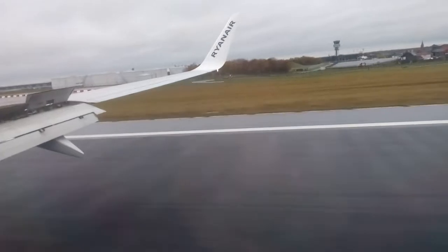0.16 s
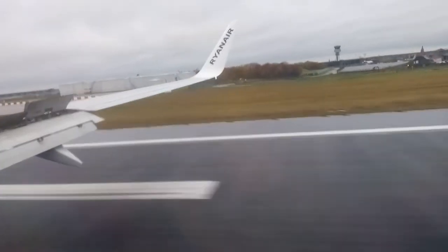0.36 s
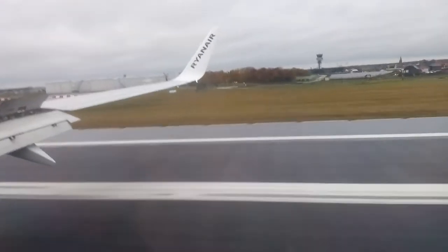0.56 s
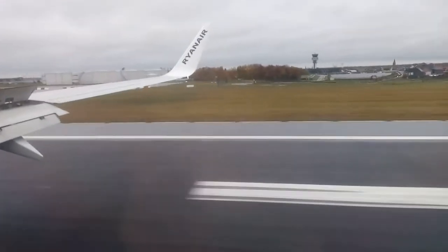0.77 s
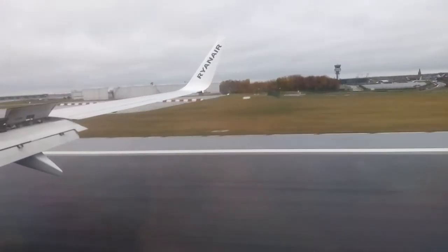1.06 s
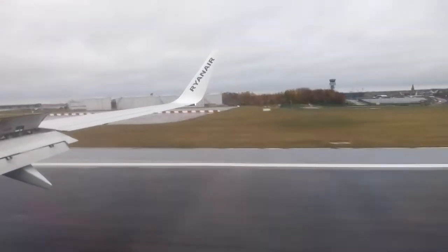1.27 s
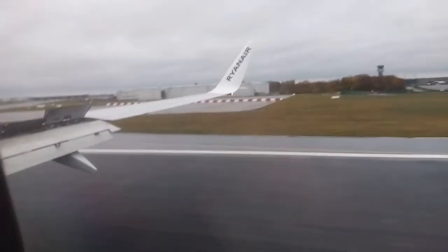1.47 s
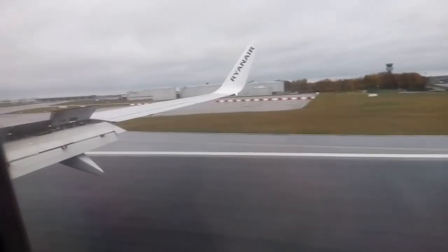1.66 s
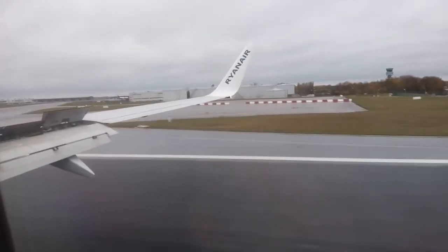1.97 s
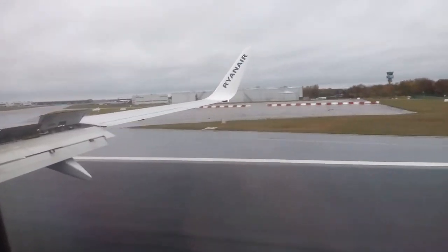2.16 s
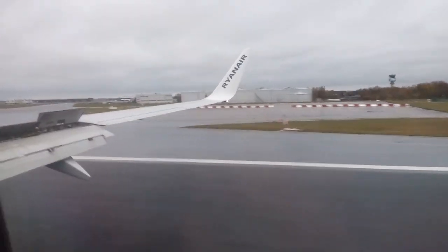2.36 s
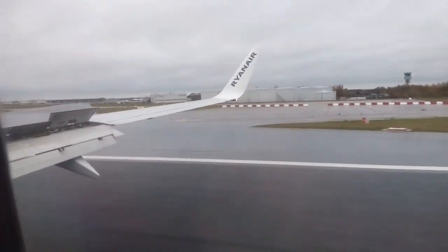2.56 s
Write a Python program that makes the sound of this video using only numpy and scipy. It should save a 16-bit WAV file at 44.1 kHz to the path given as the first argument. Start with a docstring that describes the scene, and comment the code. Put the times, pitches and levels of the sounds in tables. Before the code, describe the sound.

Inside a jet rolling on a runway, a steady low boom and muffled roar fill the small, dry cabin; loose panels rattle and jingle in the first half second, light plastic ticks follow, and a late clatter returns.

```python
"""Airliner cabin on the runway

An airliner rolls along a wet runway, heard at a cabin window: wheels and fuselage boom as low shaped noise,
jet and air roar as wall-dulled noise with panel resonances. Shaken trim rattles as dense shaped grains;
plastic ticks and panel knocks are struck damped modes, and a small metal part jingles as decaying sines."""
import sys
import numpy as np
from scipy import signal
from scipy.fft import rfft, irfft
from scipy.io import wavfile

SR = 44100
rng = np.random.default_rng(int(sys.argv[2]) if len(sys.argv) > 2 else 0)


def amp(db):
    return 10 ** (np.asarray(db, float) / 20)


def file_out(sig):
    """Save sig as 16-bit WAV at sys.argv[1]."""
    # one column per channel
    cols = np.atleast_2d(sig).T
    # limit, then scale
    lim = np.clip(cols, -1, 1)
    pcm = np.round(lim * 32767).astype(np.int16)
    wavfile.write(sys.argv[1], SR, pcm)


N = 119070

SIDES = np.array([[1], [-1]])  # left, right
# correlation of left and right in the cabin: f/Hz, likeness (-1 to 1)
LIKENESS = [(40, .99), (200, .99), (300, .96), (400, 0.97), (670, 0.26), (1220, -0.28), (2230, 0.05),
            (4060, -0.09), (7420, 0)]


def rms_one(x):
    """Normalisation of the mean power to 1."""
    return x / np.sqrt(np.mean(x ** 2) + 1e-20)


def in_time(rows):
    """Amplitude envelope: levels joined linearly in dB, as gain per sample."""
    t, db = np.transpose(rows)
    return amp(np.interp(np.arange(N) / SR, t, db))


def at_hz(points, hz):
    """Interpolation of a spectrum along a logarithmic frequency axis."""
    f, value = np.transpose(points)
    return np.interp(np.log(hz), np.log(f), value)


def drift(rate_hz):
    """Random modulation of spread 1: noise through two equal real poles at rate_hz."""
    step = 40  # samples between the computed points
    pole = np.exp(-2 * np.pi * rate_hz * step / SR)
    noise = rng.standard_normal(N // step + 2002)
    slow = signal.lfilter([1], [1, -2 * pole, pole ** 2], noise)[2000:]  # past the settling
    return np.interp(np.arange(N) / step, np.arange(len(slow)), rms_one(slow - slow.mean()))


def pair(mid, side, alike):
    """Interaural correlation: shares of two unrelated signals, the second opposed left to right."""
    alike = np.clip(alike, -.99, .99)
    return np.sqrt((1 + alike) / 2) * mid + np.sqrt((1 - alike) / 2) * side * SIDES


def coloured(x, spectrum):
    """Spectral shaping: two unrelated signals take a spectrum, the cabin's likeness and its lean."""
    # level difference of the sides: f/Hz, L-R/dB
    side_lean = [(60, 1), (180, 1.5), (300, 0), (510, -3.5), (870, 3.5), (1490, 3.5), (2540, 4.5),
                 (4340, 2.5), (7420, 9.5)]
    hz = np.maximum(np.fft.rfftfreq(N, 1 / SR), 1)
    mid, side = rfft(x) * amp(at_hz(spectrum, hz))
    lean = amp(at_hz(side_lean, hz) / 2 * SIDES)
    return rms_one(irfft(pair(mid, side, at_hz(LIKENESS, hz)) * lean, N))


def coloured_noise(spectrum):
    """Broadband random excitation given a spectrum, stereo, rms 1."""
    return coloured(rng.standard_normal((2, N)), spectrum)


def resonant_noise(hz, width_hz, alike):
    """Resonance under random drive: noise passes twice through one two-pole resonator."""
    r = np.exp(-np.pi * width_hz / SR)
    sos = [[1, 0, -1, 1, -2 * r * np.cos(2 * np.pi * hz / SR), r * r]] * 2
    settle = SR // 2
    mid, side = signal.sosfilt(sos, rng.standard_normal((2, N + settle)))[:, settle:]
    return rms_one(pair(mid, side, alike))


def wheels():
    """Structure-borne rolling noise: a deep rumble that fades with speed and wavers by about 1 dB."""
    # rumble envelope: t/s, level/dB
    level = [(0, -17.5), (.9, -20), (1.8, -20), (2.7, -27.5)]
    # rumble spectrum: f/Hz, relative density/dB per Hz
    tone = [(12, -52.5), (20, -15), (38, -3), (86, 7), (160, -6.5), (210, -29.5), (350, -120)]
    return in_time(level) * amp(drift(11)) * coloured_noise(tone)


def fuselage_boom():
    """Modal response of an enclosure: low noise plus cabin resonances under one envelope."""
    # boom envelope: t/s, level/dB (the noise lies 1 dB lower)
    envelope = [(0, -13.5), (.9, -12), (1.9, -12), (2.2, -14), (2.7, -14.5)]
    # boom spectrum: f/Hz, relative density/dB per Hz
    tone = [(65, -42.5), (110, -6.5), (178, -4), (230, -0.5), (265, -9), (346, -7.5), (372, -16),
            (440, -14.5), (473, -19), (1000, -38.5), (1300, -63), (2200, -120)]
    # cabin resonances: f/Hz, width of one resonator pass/Hz, level at mean envelope/dB
    resonances = [(177, 83, -20.5), (227, 82.6, -17.5), (289, 45, -29), (345.1, 22.3, -28.5),
                  (433.4, 29, -45.5)]
    level = in_time(envelope)
    boom = amp(-1) * level * coloured_noise(tone)
    modes = 0
    for hz, width_hz, db in resonances:
        waver = amp(db + 0.9 * drift(1.6))
        modes = modes + waver * resonant_noise(hz, width_hz, at_hz(LIKENESS, hz))
    return boom + modes * level / level.mean()


def roar():
    """Transmission loss: jet and air roar dulled by the wall, fluttering by about 1 dB."""
    # roar envelope: t/s, level/dB
    level = [(0.0, -33), (0.35, -35.5), (0.47, -37.5), (0.67, -35.5), (1.35, -34.5), (2.53, -35),
             (2.7, -34.5)]
    # roar spectrum inside the wall: f/Hz, relative density/dB per Hz
    tone = [(410, -18.5), (700, 0), (780, -2.5), (1010, -6), (1410, -6.5), (1780, -13.5), (2180, -10.5),
            (2530, -16), (3470, -20.5), (5360, -26), (6630, -31), (7870, -48), (9000, -59), (12000, -58),
            (15500, -64.5), (17300, -120)]
    return in_time(level) * amp(1.1 * drift(35)) * coloured_noise(tone)


def wall_panels():
    """Plate resonance: panels sing in narrow bands that come and go."""
    # panel resonances: f/Hz, width of one resonator pass/Hz, base level/dB, left-right likeness
    panels = [(1410, 90, -48, -.5), (2230, 130, -52, .3), (800, 80, -50, .3)]
    # swell over the base level: t/s, then gain/dB of each panel in the order above
    panel_swell = [(0, -10, -13.5, -1), (1.1, -6, -3.5, 0), (1.45, 0.5, -1, 2), (1.65, -2.5, -3.5, 8.5),
                   (1.78, -0.5, -4, 3), (2.0, 11.5, 0, 3), (2.15, -2.5, -9, 5.5), (2.28, -4, 8, 3),
                   (2.45, 5, -9.5, -10), (2.55, 6, 11.5, 2), (2.7, -2.5, -3.5, -14)]
    swell = np.array(panel_swell)
    waver_db, waver_hz = 3.5, 7
    out = 0
    for k, (hz, width_hz, db, alike) in enumerate(panels):
        level = in_time(swell[:, [0, k + 1]]) * amp(db + waver_db * drift(waver_hz))
        out = out + level * resonant_noise(hz, width_hz, alike)
    return out


def rattles():
    """Repeated micro-impacts: dense grains under rising and dying envelopes, patchy in each band."""
    # trim rattles: t of peak/s, level before the common gain/dB, rise/s, t60/s, L-R/dB, tilt/dB per octave
    events = [(0.018, -33.5, 0.008, 0.22, -4.5, -0.5), (.08, -42, 0.021, 0.16, 1.5, 2.5),
              (0.123, -26.5, 0.0083, 0.34, -5, -.3), (0.151, -34, 0.01, 0.34, 1, 2),
              (0.202, -33, 0.0087, 0.27, -1, -0.8), (.30, -33.5, 0.04, 0.47, -1, 1.2),
              (0.374, -26.5, 0.005, 0.22, -3, 0.5), (0.438, -24, 0.012, .2, -2.5, 2.3),
              (0.444, -36, 0.004, 0.088, -1.5, -6), (0.494, -25, 0.0036, .07, -3, 4.6),
              (0.513, -29, 0.006, 0.1, -3, -1.5), (0.599, -39.5, 0.012, 0.15, -4, 2.5),
              (0.701, -40, 0.013, 0.17, 2.5, 1.7), (.75, -44, 0.014, 0.48, 3.5, 4.5),
              (1.36, -34.5, 0.0068, 0.11, 7.5, -5.5), (2.314, -35.5, 0.0085, 0.25, 2, -1.5),
              (2.336, -28.5, 0.011, 0.28, -0.5, -3), (2.348, -33.5, .006, 0.17, -3, -4),
              (2.428, -37.5, 0.0046, 0.3, -2, -1.5), (2.482, -40.5, 0.013, 0.15, 1, .8),
              (2.589, -35, 0.0059, 0.092, 0.5, -2.8)]
    # grain spectrum: f/Hz, relative density/dB per Hz
    tone = [(530, -21.5), (900, 6.5), (1100, -4.5), (1650, -5.5), (2070, -5), (2750, -5), (3840, -8),
            (5780, -9.5), (6390, -12.5), (7870, -24.5), (10200, -37.5), (13000, -49), (15500, -45),
            (17300, -120)]
    # edges of the bands that crackle independently: f/Hz
    band_edges = [400, 1200, 2000, 3200, 4800, 7000, 16000]
    grains_per_s, grain_db, grain_cap = 6000, 2.5, 3
    gain_db, patch_db, patch_hz, pivot_hz = -5, 1.6, 60, 3000

    present = rng.random((2, N)) < grains_per_s / SR
    strength = amp(grain_db * np.minimum(rng.exponential(1, (2, N)), grain_cap))
    grains = coloured(present * strength * rng.choice([-1, 1], (2, N)), tone)

    powers = []
    for t, db, rise, t60, pan_db, _ in events:
        age = np.arange(N) / SR - t
        onset = np.clip(1 + age / rise, 0, 1)
        envelope = onset * amp(db + gain_db - 60 * np.maximum(age, 0) / t60)
        powers.append((envelope * amp(pan_db / 2 * SIDES)) ** 2)

    tilts = np.array(events)[:, -1]
    out = 0
    for k, (low, high) in enumerate(zip(band_edges, band_edges[1:])):
        # twice the octaves from the pivot to the band centre, so amp() weights power
        weights = amp(tilts * np.log2(low * high / pivot_hz ** 2))
        power = np.tensordot(weights, powers, 1)
        sos = signal.butter(2, [low, high], "band", fs=SR, output="sos")
        band = signal.sosfilt(sos, grains)
        patches = amp(patch_db * drift(patch_hz))
        out = out + (-1) ** k * np.sqrt(power) * patches * band  # neighbouring bands alternate in sign
    return out


def ring(clicks, hz, t60):
    """Impulse response of a damped oscillator: a unit click starts a decaying sine of height 1."""
    r, w = amp(-60 / (t60 * SR)), 2 * np.pi * hz / SR
    return signal.lfilter([0, np.sin(w)], [1, -2 * r * np.cos(w), r * r], clicks + 1e-18)


def struck(events, modes, spread_db, contact_s):
    """Modal superposition: each blow excites every mode, and a soft contact spares the high ones."""
    t, db, pan_db, cut_hz = np.transpose(events)
    at = (t * SR).astype(int)
    out = np.zeros((2, N))
    for hz, level_db, t60 in modes:
        clicks = np.zeros((2, N))
        chance = rng.standard_normal((3, len(t)))
        reach = 1 / np.sqrt(1 + (hz / cut_hz) ** 8)
        # each side draws its own strength
        clicks[:, at] = reach * amp(db + level_db + pan_db / 2 * SIDES + spread_db * chance[:2])
        clicks[1, at] *= np.sign(chance[2] + .7)  # about a quarter are inverted on the right
        # a brief ring at the same pitch drives the mode, which softens its onset
        push = ring(clicks, hz, contact_s) * 2 * (1 - amp(-60 / (contact_s * SR)))
        out += ring(push, hz, t60)
    return out


def knocks():
    """Flexural modes of a panel: dull knocks."""
    # blows: t/s, strike level/dB, L-R/dB, contact cut-off f/Hz
    blows = [(.1245, -26, -4, 3400), (.496, -14, 7, 5200), (1.361, -23, 7, 2600), (1.367, -30, 7, 1500),
             (1.88, -30, 7, 2400), (2.343, -25, 5, 2400), (2.354, -22, 3, 950)]
    # panel modes: f/Hz, relative level/dB, t60/s
    modes = [(800, -5.5, 0.026), (1140, -6, 0.016), (1480, -1.5, 0.0099), (1750, -3.5, 0.0095),
             (2037, -4.5, 0.022), (2890, -10, 0.0092), (3400, -13.5, 0.01), (4260, -12, 0.013)]
    return struck(blows, modes, spread_db=1.5, contact_s=.002)


def jingles():
    """Free decay of a small metal part: single high sines that swell in briefly."""
    # rings: t/s, level before rise and decay (left side)/dB, f/Hz, t60/s
    rings = [(.13, -58, 11850, .05), (.203, -36, 6000, 0.031), (0.265, -50, 11870, .02),
             (.448, -56, 12000, .03), (.4925, -26, 6090, .04), (.4935, -48, 10500, .03),
             (.511, -38, 6150, .025), (.514, -57, 11400, .04), (1.286, -60.5, 12140, 0.033),
             (2.34, -37, 7080, .05), (2.354, -39, 6920, 0.035), (2.368, -44, 7100, .04),
             (2.384, -50.5, 7060, 0.028)]
    rise_s = 0.0018
    out = np.zeros(N)
    for t, db, hz, t60 in rings:
        age = np.maximum(np.arange(N) / SR - t, 0)
        onset = np.minimum(age / rise_s, 1) ** 2
        out += onset * amp(db - 60 * age / t60) * np.sin(2 * np.pi * hz * age)
    return out * amp(np.array([[1.0], [-1.5]]))  # leans left by 2.5 dB; left itself gains 1 dB


def ticks():
    """Stiff-body modes of hard plastic: sharp ticks."""
    # blows: t/s, strike level/dB, L-R/dB, contact cut-off f/Hz
    blows = [(.911, -40, 5, 7600), (1.081, -37, 10, 7000), (1.1095, -28.5, 11.5, 7700),
             (1.302, -36, 9, 6600), (1.3845, -34, 11, 6230), (1.3935, -32.5, 10, 8500),
             (1.473, -37.5, 10, 8500), (1.72, -40.5, 4, 7000), (1.865, -43, 5, 7950), (2.168, -37, 9, 6960),
             (2.2815, -31, 8, 8000), (2.5685, -29.5, 12, 7500)]
    # plastic modes: f/Hz, relative level/dB, t60/s
    modes = [(4200, -5, 0.0063), (5840, -0.5, 0.0049), (6310, -3, 0.0074), (7140, -6.5, 0.0064),
             (8300, -11.5, 0.0042), (9400, -19.5, 0.012), (10200, -19, 0.0056), (12000, -31, 0.0014),
             (13800, -34, 0.0037)]
    return struck(blows, modes, spread_db=2, contact_s=.003)


def cabin(x):
    """Diffuse reverberation: a short exponentially decaying noise tail, separate on each side."""
    t60_s, wet_db, gap_s = 0.069, -16.5, .003
    t = np.arange(SR // 4) / SR
    tail = rng.standard_normal((2, len(t))) * amp(-60 * t / t60_s) * (t > gap_s)
    tail /= np.linalg.norm(tail, axis=1, keepdims=True)
    return x + amp(wet_db) * signal.fftconvolve(x, tail, axes=1)[:, :N]


def scene():
    """Linear superposition of all sources at the window seat; only the hits get the added tail."""
    hits = knocks() + jingles() + ticks()
    return wheels() + fuselage_boom() + roar() + wall_panels() + rattles() + cabin(hits)


def low_pass(x):
    """Removes everything above the highest recorded frequency."""
    return signal.sosfilt(signal.butter(12, 15450, fs=SR, output="sos"), x)


def record(dry):
    """Soft saturation: a hyperbolic tangent rounds the peaks."""
    ceiling = 1.4
    mix = ceiling * np.tanh(dry / ceiling)
    return low_pass(mix)


dry = scene()
out = record(dry)
file_out(out)
```